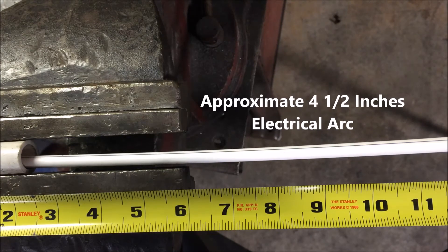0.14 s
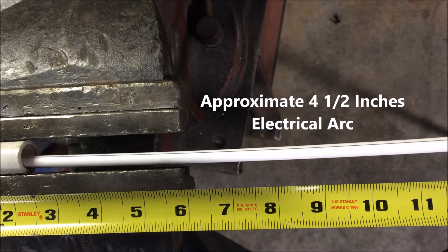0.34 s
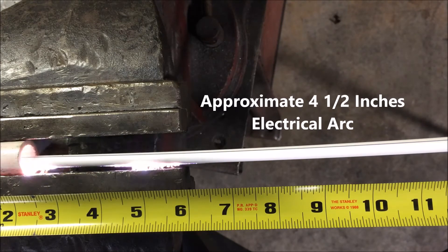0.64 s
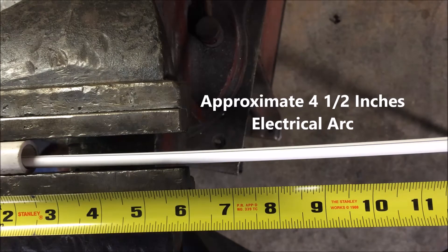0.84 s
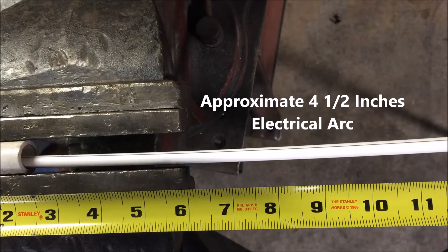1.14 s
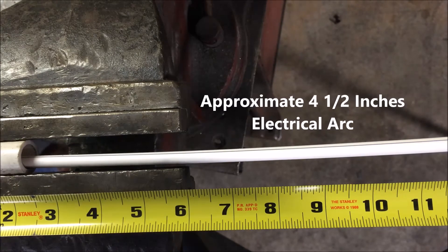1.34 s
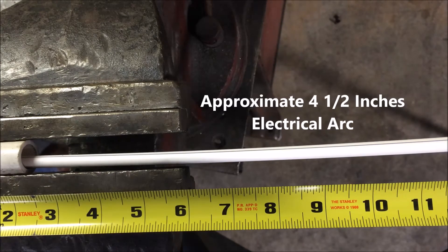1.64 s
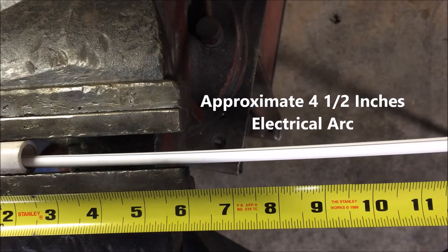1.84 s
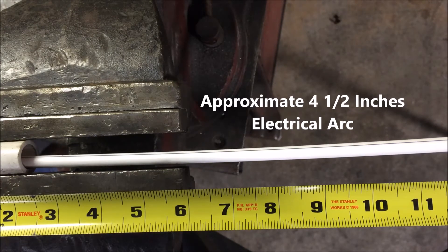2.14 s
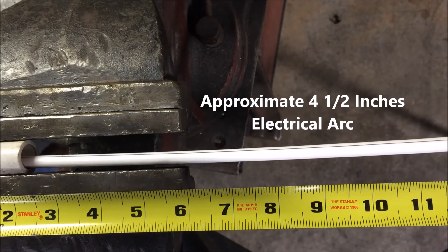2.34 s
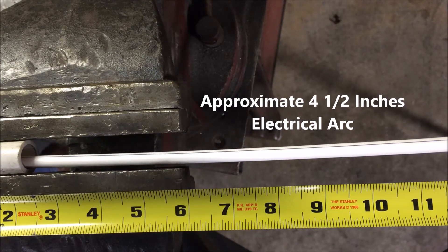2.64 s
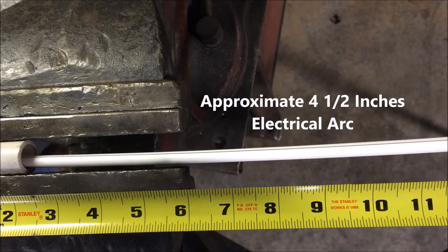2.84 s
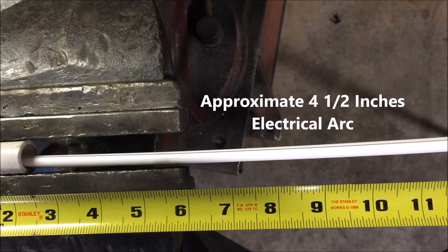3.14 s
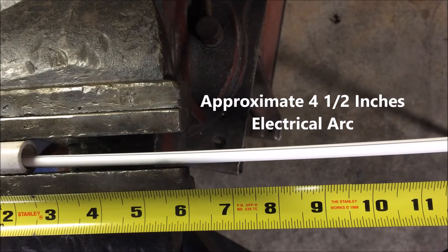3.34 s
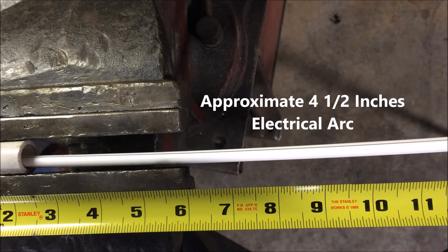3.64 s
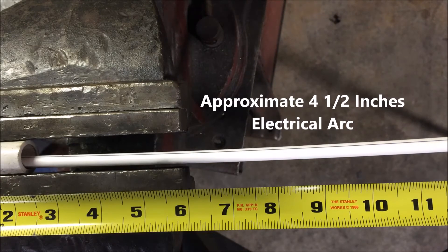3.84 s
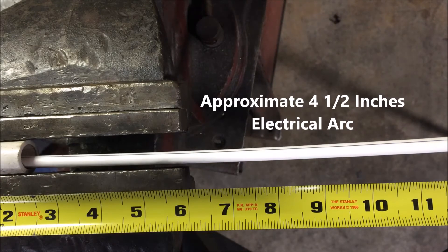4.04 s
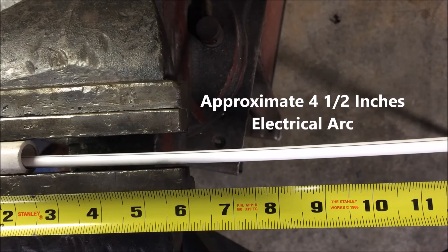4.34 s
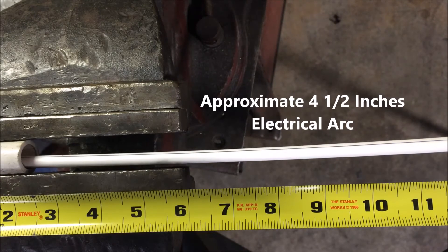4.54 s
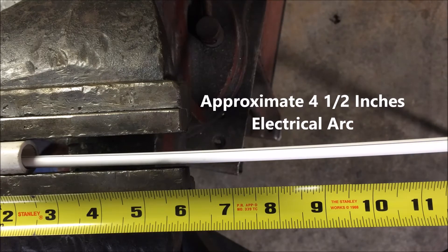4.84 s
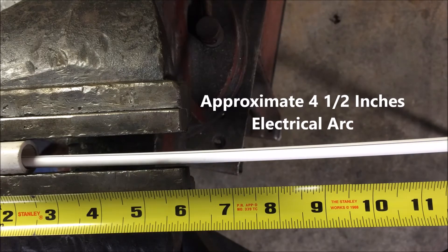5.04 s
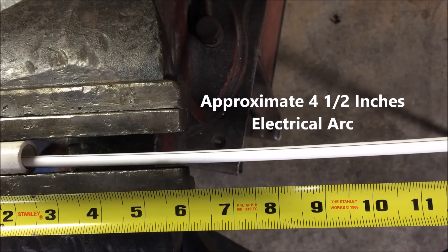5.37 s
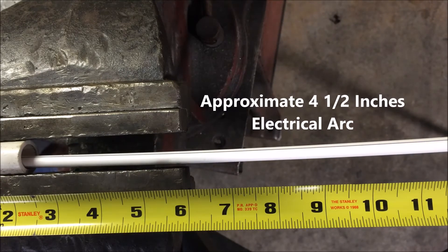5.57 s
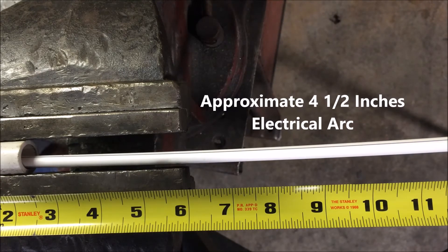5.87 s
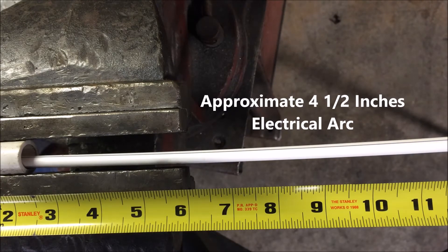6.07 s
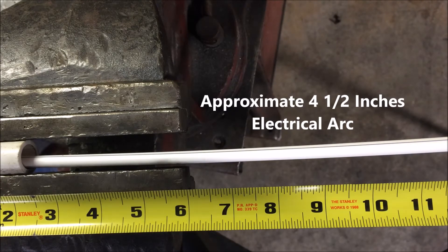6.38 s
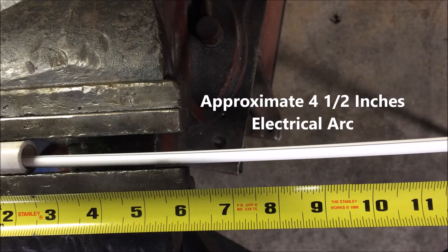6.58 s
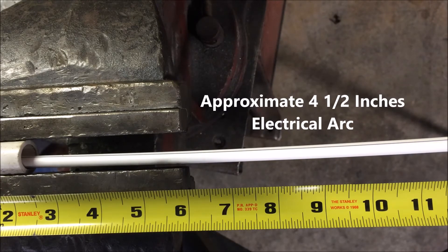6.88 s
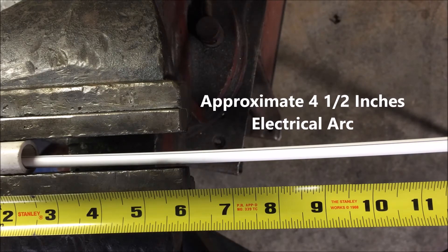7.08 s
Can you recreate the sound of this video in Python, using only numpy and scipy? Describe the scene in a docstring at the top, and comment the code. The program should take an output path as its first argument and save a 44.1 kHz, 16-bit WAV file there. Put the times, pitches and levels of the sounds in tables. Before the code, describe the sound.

In a quiet workshop with a low wavering hum, soft rumble and faint whines, an electric fence charger arcs onto a steel vise six times, a little over a second apart. Each spark is a sharp, overloaded crack with a low thump, metallic ringing and a short bright reverberant tail. The microphone is very close, and the background dips after every snap.

```python
"""A low wavering hum, two faint whines and workshop noise are heard first; a higher hum joins late. Six times,
about once a second, an electric fence charger arcs from a wire to a steel vise. Each discharge is a broadband
crack with modal ringing and a reverberant tail; a low flutter and a faint tick come just ahead of it. It
overloads the close microphone into a low thump; a last flutter and tick, with no snap after them, end the
scene. Gain control ducks the background after every snap."""
import sys
import numpy as np
from scipy import signal
from scipy.fft import rfft, irfft
from scipy.io import wavfile
from scipy.ndimage import uniform_filter1d, minimum_filter1d

SR = 44100
rng = np.random.default_rng(int(sys.argv[2]) if len(sys.argv) > 2 else 0)


def store_pcm(level_fs):
    """Save levels as 16-bit WAV."""
    pcm = np.round(np.clip(level_fs, -1, 1) * 32767).astype(np.int16)
    wavfile.write(sys.argv[1], SR, np.atleast_2d(pcm).T)


N = 317961
TIME = np.arange(N) / SR


def amp(db):
    """Level law: decibels to amplitude ratio."""
    return 10 ** (np.asarray(db) / 20)


def evened(x):
    """Normalisation: scales a signal to rms 1."""
    return x / np.sqrt(np.mean(x ** 2) + 1e-20)


def read(points, hz):
    """Logarithmic frequency: interpolates a table on a log-frequency axis."""
    f, value = np.transpose(points)
    return np.interp(np.log(hz + 1), np.log(f + 1), value)


def curve(table):
    """Envelope: joins (t/s, value) points by straight lines over the scene."""
    return np.interp(TIME, *np.transpose(table))


def add(mix, s, sound):
    """Superposition: adds a sound to the mix from time s."""
    part = mix[round(s * SR):][:len(sound)]
    part += sound[:len(part)]


def noise(points, size):
    """Spectral shaping: white noise weighted by a spectrum, at rms 1."""
    hz = np.fft.rfftfreq(size, 1 / SR)
    spectrum = rfft(rng.standard_normal(size)) * amp(read(points, hz))
    return evened(irfft(spectrum, size))


def band(hz, width, size):
    """Resonance: noise of rms 1 under one bell-shaped line; centred on 0 Hz it is a slow random drift."""
    f = np.fft.rfftfreq(size, 1 / SR)
    spectrum = rfft(rng.standard_normal(size)) / (1 + (2 * (f - hz) / width) ** 2)
    return evened(irfft(spectrum, size))


def tone(hz, waver, unsteadiness, rate_hz):
    """Random modulation: a line of rms 1 whose frequency and amplitude drift by the given rms fractions."""
    frequency = hz * (1 + waver * band(0, rate_hz, N))
    turns = np.cumsum(frequency) / SR
    strength = 1 + unsteadiness * band(0, rate_hz, N)
    return evened(np.sin(2 * np.pi * turns) * strength)


# Start of the low hum and its rise in the first second
HUM_HZ, HUM_RISE_HZ = 73.093, 4.6
# Higher hum: onset, fade-in time and full level
DRONE_START_S, DRONE_RISE_S, DRONE_DB = 6.3, 0.332, -65.5
# Level of the low hum over time: t/s, level/dB
HUM_LEVEL = [(0, -50), (.55, -45.5), (1.05, -42), (1.6, -42), (2.1, -49.5), (3.7, -47), (5.5, -57.5),
             (7.1, -49)]


def hum(drone_hz=257):
    """Frequency glide: a low line climbs ever more slowly; a fainter, higher line sets in late."""
    rising_hz = HUM_HZ + HUM_RISE_HZ * np.sqrt(TIME)
    low = amp(curve(HUM_LEVEL)) * tone(rising_hz, waver=0.023, unsteadiness=.35, rate_hz=10)
    onset = np.clip((TIME - DRONE_START_S) / DRONE_RISE_S, 0, 1)
    drone = tone(drone_hz, waver=0.001767, unsteadiness=0.0856, rate_hz=5.262)
    return low + amp(DRONE_DB) * onset * drone


# High whine: starting level, fade rate and the faint level that remains
HIGH_WHINE_DB, HIGH_FADE_DB_PER_S, HIGH_REST_DB = -66, 5.5, -85.5
# The low whine sinks, then slowly grows: t/s, level/dB of its line
WHINE_LEVEL = [(0, -72.5), (1.3, -81.5), (3.3, -76), (7.2, -68)]


def whines(low_hz=1669, halo_db=-7, halo_width_hz=60, high_hz=4280, high_width_hz=75):
    """Line width: a thin line in a noisy halo, and above it a narrow noise band that dies down."""
    line = tone(low_hz, waver=0.0011, unsteadiness=0.34, rate_hz=16)
    halo = amp(halo_db) * band(low_hz, halo_width_hz, N)
    # the fading part and the constant rest add in power
    fading = np.hypot(amp(HIGH_WHINE_DB - HIGH_FADE_DB_PER_S * TIME), amp(HIGH_REST_DB))
    return amp(curve(WHINE_LEVEL)) * (line + halo) + fading * band(high_hz, high_width_hz, N)


AIR_DB = -57.5  # room noise level before it drifts
# Spectrum of the room noise: f/Hz, relative level/dB (spectral density)
AIR = [(40, -39), (110, -3), (150, -8), (250, -12), (320, -18.5), (500, -27.5), (750, -27), (1000, -22),
       (1500, -28.5), (2600, -30.5), (4000, -35), (9000, -42.5), (11000, -49), (15000, -52)]
# Spectrum of the rumble under the hum: f/Hz, relative level/dB (spectral density)
RUMBLE = [(15, -48.5), (30, -27.5), (42, -4.5), (60, 3), (85, -4), (110, -4.5), (150, -29), (600, -81)]


def air(rumble_db=-52, patchy_db=3.5, smooth_above_hz=4000, swell_db=-1.5):
    """Non-stationary noise: rumble and hiss whose lows and mids drift in patches, with smoother treble."""
    steady = amp(AIR_DB) * noise(AIR, N) + amp(rumble_db) * noise(RUMBLE, N)
    hz, _, z = signal.stft(steady, SR, nperseg=2048, noverlap=1536)
    # smooth random gains over frequency, then over time
    across_hz = uniform_filter1d(rng.standard_normal(z.shape), size=5, axis=0)
    patches = evened(uniform_filter1d(across_hz, size=6, axis=1))
    z = z * amp(patchy_db * patches / (1 + (hz[:, None] / smooth_above_hz) ** 2))
    drifting = signal.istft(z, SR, nperseg=2048, noverlap=1536)[1][:N]
    return drifting * amp(swell_db * band(0, 5.5, N))


def flutter(t, thump_db, hz=270, width_hz=340, level_db=-25):
    """Exponential growth: low noise swells for milliseconds into the snap, more before a heavy thump."""
    rise_s, follow = .0065, .55  # follow: dB more for each dB of thump
    decaying = band(hz, width_hz, len(t)) * np.exp(-t / rise_s)
    return amp(level_db + follow * thump_db) * decaying[::-1]


# Colour of the crack, shared by the tick: f/Hz, relative level/dB
CRACK = [(100, -6), (600, 0), (1500, 2.5), (4000, 5), (6500, -6.5), (10000, -2.5), (15000, 4.5)]


def tick(t, fall_s=0.00081, body_db=-5, body_hz=450, body_width_hz=900, body_s=.002):
    """Brief decay: a faint, dry broadband tick with a little low body, just ahead of the snap."""
    body = amp(body_db) * band(body_hz, body_width_hz, len(t)) * np.exp(-t / body_s)
    return noise(CRACK, len(t)) * np.exp(-t / fall_s) + body


def crack(t, fall_s=0.0013, scatter_db=-17, scatter_s=0.013):
    """Shock and scattering: the spark's steep front, then its slower scatter from vise and bench."""
    front = np.exp(-t / fall_s)
    scatter = amp(scatter_db) * np.exp(-t / scatter_s)
    return noise(CRACK, len(t)) * (front + scatter)


# Modes of the gap between the steel faces, the lowest nearly harmonic:
# f/Hz, relative level/dB, t60/s
RING = [(1238, 1, .3), (2480, 2, .42), (3750, 1, .4), (4100, 6, .05), (5033, -7, .26), (6239, -13, .4),
        (9560, -6, .3), (9890, -5, .42), (13850, -6, .2)]


def ring(t, level_db=-39, spread_hz=130):
    """Modal decay: each mode dies exponentially inside a cluster of close neighbours."""
    blur = 1.3  # neighbours against the pure mode
    out = np.zeros(len(t))
    for hz, db, t60 in RING:
        mode = np.sin(2 * np.pi * hz * t)
        neighbours = blur * band(hz, spread_hz, len(t))
        out += amp(db - 60 * t / t60) * (mode + neighbours)
    return amp(level_db) * out


# Colour of the workshop's answer: f/Hz, relative level/dB
ROOM = [(100, -9), (500, -2.5), (1200, -3.5), (2600, 1), (4200, 1), (7000, 3), (10000, 3.5), (15000, -3.5)]
# Reverberation time of the workshop: f/Hz, t60/s
ROOM_T60 = [(300, 0.11), (800, 0.45), (2000, 0.56), (5500, .5), (10000, 0.44), (15000, .4)]


def room(t, level_db=-24, build_s=0.003):
    """Reverberation: dense reflections build up, and each band dies at its own rate."""
    hz, at, z = signal.stft(noise(ROOM, len(t)), SR, nperseg=256)
    decay = amp(-60 * at / read(ROOM_T60, hz)[:, None])
    tail = signal.istft(z * decay, SR, nperseg=256)[1][:len(t)]
    return amp(level_db) * tail * (1 - np.exp(-t / build_s))


def thump(t, settle_hz, t60, glide_s=.0012, quick_turns=2.2):
    """Overload: the jolted microphone swings fast, slows to its bass limit and stops short."""
    steepening = 1.5  # above 1, the decay quickens
    # half of the quick turns are made by glide_s
    turns = settle_hz * t + quick_turns * t / (t + glide_s)
    return np.sin(2 * np.pi * turns) * amp(-60 * (t / t60) ** steepening)


# Room level at 0 dB strength, and its growth in dB for each dB of strength
ROOM_DB, ROOM_FOLLOW = -3, 0.4
TICK_DB = -42  # relative to the crack
# One row a spark, only the lead-in of the last being heard:
# t/s, jolt level/dB, crack level/dB, settled thump f/Hz, thump t60/s, relative ring level/dB
SPARKS = [(0.7284, -3, 8, 54, 0.06273, 2), (1.812, 6.5, 6.5, 51, .095, -17.5),
          (2.895, 21, 12, 46.5, 0.066824, -14.5), (3.9787, 8.5, 6.5, 43, 0.10182, -19),
          (5.062, 18, 11, 46, .076, -17.5), (6.1452, 6.5, 6.5, 51, 0.09715, -4),
          (7.2285, 9, 6, 49, .09, -15.5)]


def sparks():
    """Impulse and response: flutter and tick lead; the discharge cracks, rings, fills the room and thumps."""
    out, t = np.zeros(N), np.arange(SR) / SR
    brief = t[:SR // 20]
    tick_lead_s = .0232
    for s, strength_db, crack_db, settle_hz, t60, ring_db in SPARKS:
        room_db = ROOM_DB + ROOM_FOLLOW * strength_db
        add(out, s - len(brief) / SR, flutter(brief, strength_db))
        add(out, s - tick_lead_s, amp(crack_db + TICK_DB) * tick(brief))
        add(out, s, amp(crack_db) * crack(t))
        add(out, s, amp(ring_db) * ring(t))
        add(out, s, amp(room_db) * room(t))
        add(out, s, amp(strength_db) * thump(t, settle_hz, t60))
    return out


def scene():
    """Superposition: sparks over the quiet workshop."""
    return (hum() + whines() + air() + sparks())[None]


def lag(x, seconds):
    """Relaxation: one-pole smoothing with the given time constant."""
    r = np.exp(-1 / (seconds * SR))
    return signal.lfilter([1 - r], [1, -r], x)


def recover(cut_db, db_per_s):
    """Linear release: a gain cut lets go at a steady rate."""
    return np.maximum.accumulate(cut_db + db_per_s * TIME) - db_per_s * TIME


def limiter_cut(x, threshold_db=-18, most_db=8, hold_s=0.16313, release_db=400, attack_s=0.0097):
    """Peak limiting: a quick cut in dB, held for a moment and then released (dB per s)."""
    level_db = 10 * np.log10(lag(x ** 2, .001) + 1e-12)
    over_db = np.clip(level_db - threshold_db, 0, most_db)
    size = int(hold_s * SR)
    # greatest excess within the past hold time
    held_db = -minimum_filter1d(-over_db, size, origin=(size - 1) // 2, mode="constant")
    return lag(recover(held_db, release_db), attack_s)


def leveller_cut(x, threshold_db=-16.0, share=0.74833, release_db=20, attack_s=0.053):
    """Compression: a slow cut in dB grows with the snap's energy and is released slowly (dB per s)."""
    memory_s = .05
    level_db = 10 * np.log10(lag(x ** 2, memory_s) + 1e-12)
    over_db = np.maximum(level_db - threshold_db, 0)
    return lag(recover(share * over_db, release_db), attack_s)


def bell(x, hz, width_hz, db):
    """Resonant equalisation: lifts or lowers one band."""
    return x + (amp(db) - 1) * signal.lfilter(*signal.iirpeak(hz, hz / width_hz, fs=SR), x)


EDGE_HZ = 15280  # upper band limit


def record(dry):
    """Saturation: gain control comes too late and the snap clips; then midrange colour and a band limit."""
    ceiling, knee = .54, 3.2  # full-scale fraction, sharpness of the bend
    x = dry[0] / amp(limiter_cut(dry[0]) + leveller_cut(dry[0]))
    clipped = x / (1 + abs(x / ceiling) ** knee) ** (1 / knee)
    dipped = bell(clipped, hz=1055.3, width_hz=300, db=-5.0)
    coloured = bell(dipped, hz=1560, width_hz=140, db=2.5)
    low_pass = signal.firwin(601, EDGE_HZ, window=("kaiser", 8), fs=SR)
    return signal.oaconvolve(coloured, low_pass, "same")[None]


dry = scene()
out = record(dry)
store_pcm(out)
```